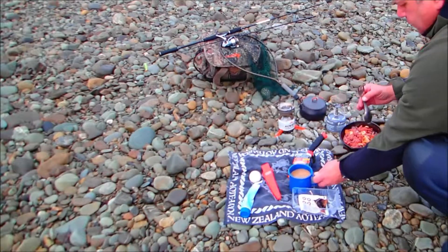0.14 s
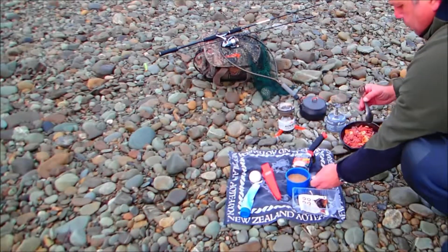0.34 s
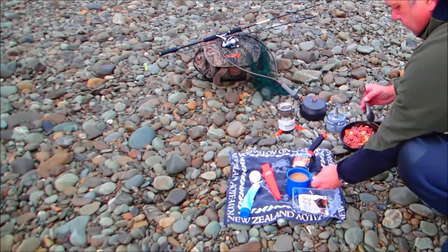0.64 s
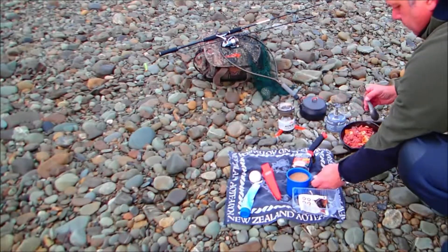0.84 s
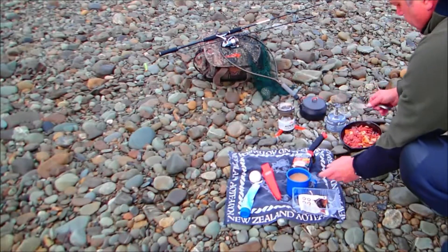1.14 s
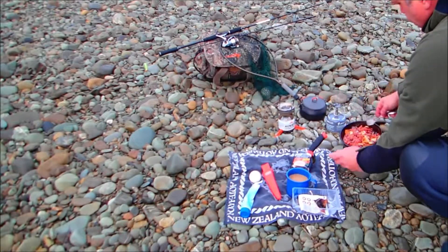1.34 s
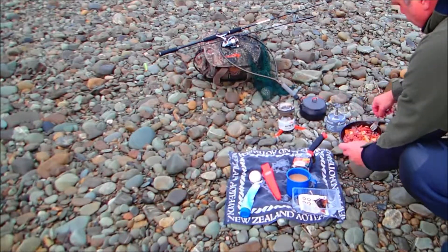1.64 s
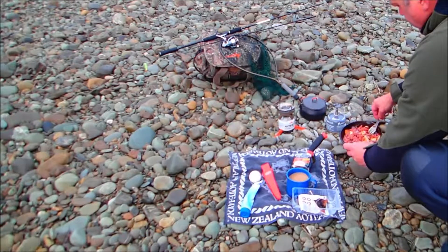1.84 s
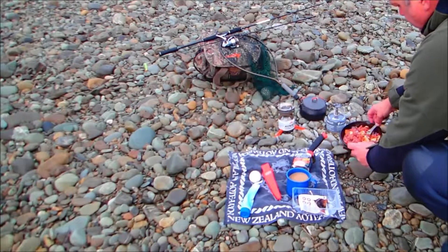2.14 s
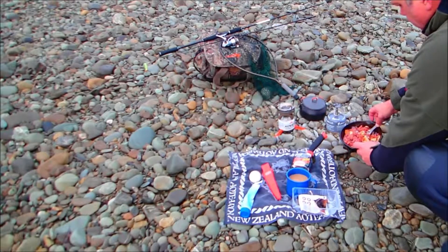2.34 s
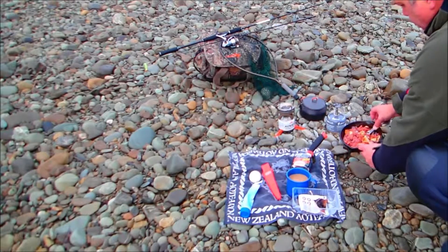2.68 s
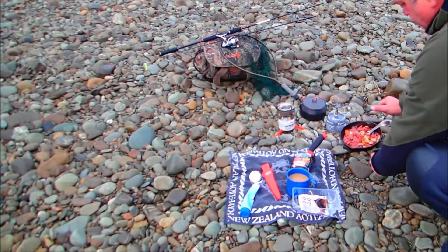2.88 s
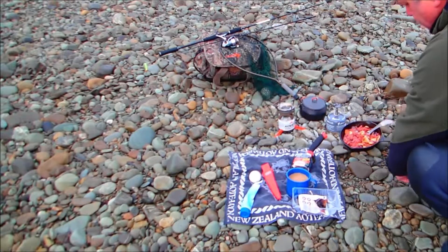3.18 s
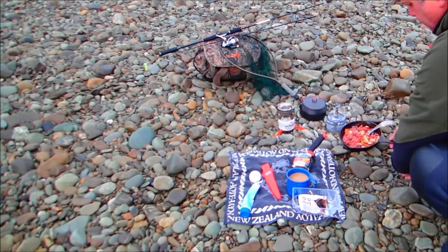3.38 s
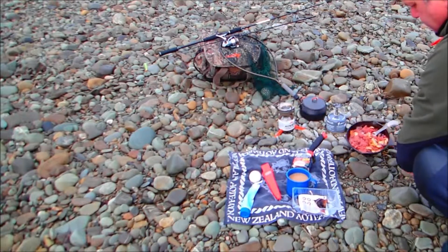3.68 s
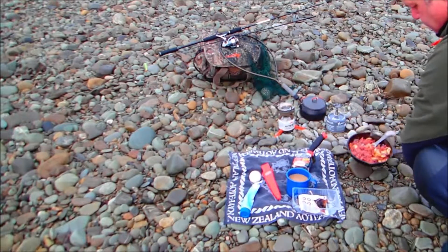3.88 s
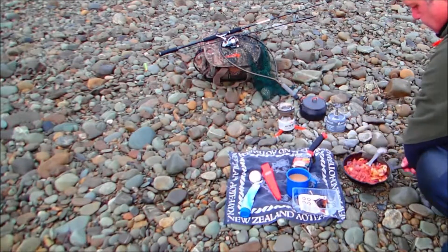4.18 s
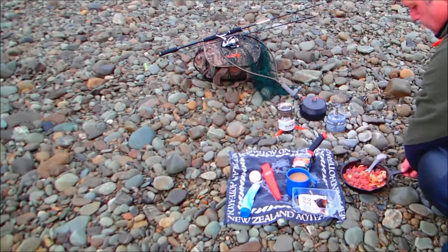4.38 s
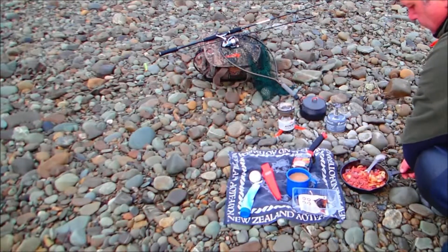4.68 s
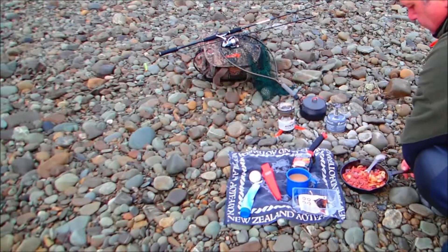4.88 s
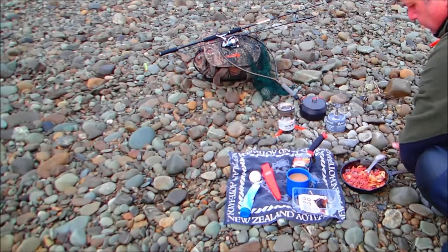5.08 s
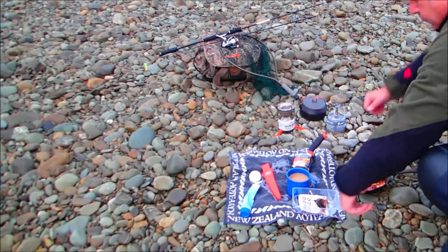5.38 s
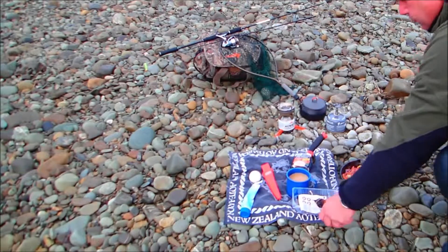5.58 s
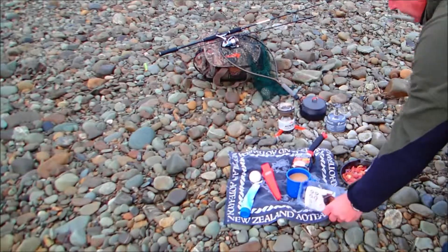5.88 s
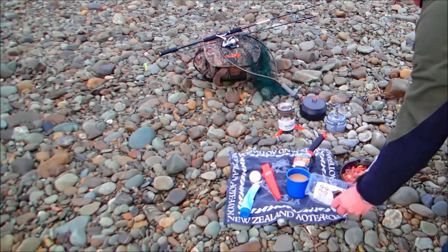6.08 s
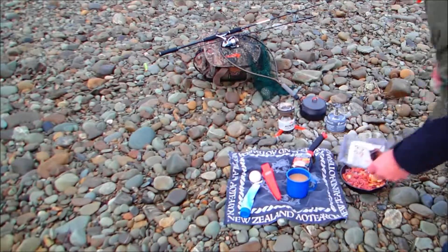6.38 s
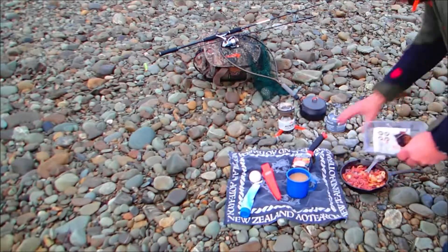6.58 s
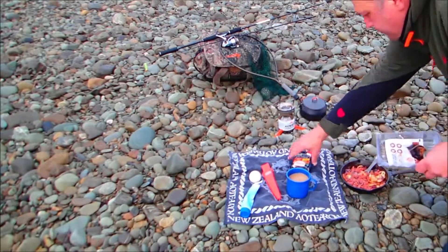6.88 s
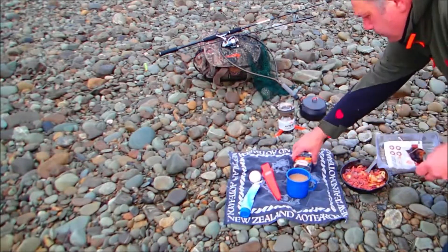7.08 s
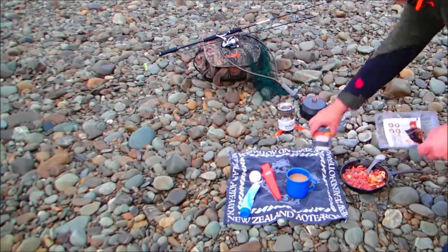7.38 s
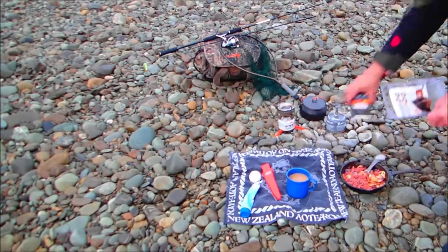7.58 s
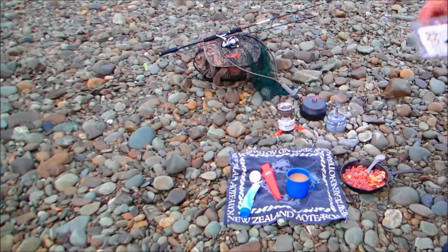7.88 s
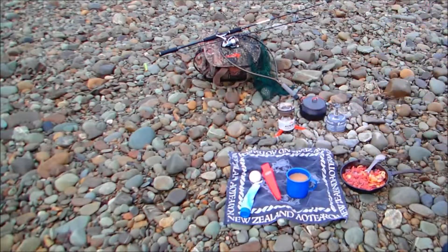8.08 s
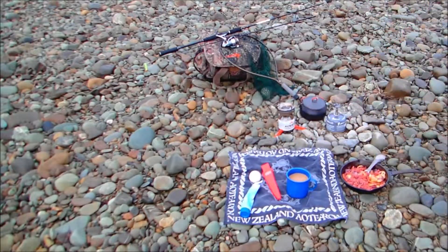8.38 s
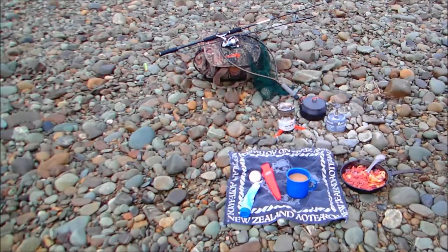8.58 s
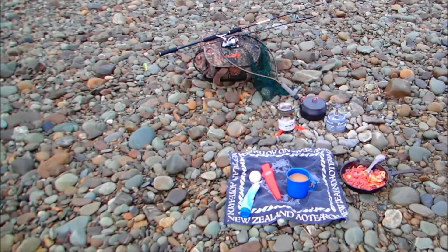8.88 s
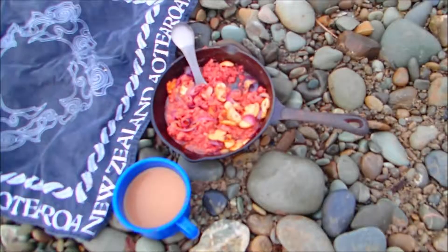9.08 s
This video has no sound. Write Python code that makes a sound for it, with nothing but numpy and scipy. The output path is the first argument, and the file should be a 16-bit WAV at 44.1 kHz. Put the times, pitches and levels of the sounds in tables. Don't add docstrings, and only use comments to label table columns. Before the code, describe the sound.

Close handling sounds, slightly left, over a distant rushing river and lively songbirds. First come light fabric shuffles, a brief spoon tick and low wind bumps, then two rapid metallic knocks as a pan settles on stones. Plastic crackling and sleeve sweeps grow brighter and busier, ending with loud dry pebble clacks underfoot. Open air, small stereo microphone, short bird echoes.

```python
import sys
import numpy as np
from scipy import signal
from scipy.fft import rfft, irfft
from scipy.io import wavfile
from scipy.ndimage import uniform_filter1d

SR = 44100
rng = np.random.default_rng(int(sys.argv[2]) if len(sys.argv) > 2 else 0)


def file_out(sig):
    cols = np.atleast_2d(sig).T
    lim = np.clip(cols, -1, 1)
    pcm = np.round(lim * 32767).astype(np.int16)
    wavfile.write(sys.argv[1], SR, pcm)


def invert_db(x):
    u = np.asarray(x, float) / 20
    return 10 ** u


N = 407484

# (frequency [Hz], density [dB per Hz])
RIVER_SPECTRUM = [(88, -11), (150, -5.5), (723, -0.5), (972, -4.5), (1790, -7.5), (3420, -6.5),
                  (4080, -9.5), (4510, -9), (5380, -3.5), (6050, -12), (7970, -15.5), (15000, -17.5),
                  (16500, -25)]
# (frequency [Hz], correlation [0..1])
RIVER_LIKENESS = [(200, 0.51), (1500, 0.26), (3000, 0.46), (5500, 0.3), (8000, 0.057), (15000, .02)]
# (time [s], level [dB])
GUSTS = [(0, -76), (1.45, -72), (1.7, -54), (1.9, -76), (2.25, -60.5), (2.6, -67), (3.5, -71), (4.4, -73.5),
         (4.6, -63.5), (5.7, -65), (6.0, -75), (9.24, -74)]
# (time [s], level [dB], 10 dB under the peak, pitch [Hz], left-right difference [dB])
WIND_PUFFS = [(1.635, -38.5, 130, 21.0), (1.677, -42, 145, 15.0), (1.699, -48, 118, -5),
              (2.711, -48.5, 111, -2), (2.728, -48.5, 167, 7), (2.8, -50, 127, 4), (2.914, -51, 145, 4),
              (3.109, -48.5, 122, 15.5), (3.174, -45.5, 163, -1), (4.645, -44, 113, -18),
              (4.759, -53, 72.54, 8.5), (8.059, -49, 252, 0)]

# (frequency [Hz], density [dB per Hz])
RUSTLE_SPECTRUM = [(200, -12.5), (562, -7), (1610, -11), (2600, -6), (4200, -19), (4800, -8.5), (5300, -2),
                   (5900, -10), (6800, -19), (8000, -18), (12000, -18.5), (14000, -29), (16500, -47)]
# (time [s], rustle level [dB])
FIDGETING = [(0, -53), (.3, -50), (1.0, -50.5), (1.5, -68), (2.2, -55.5), (2.7, -48), (3.3, -52.5),
             (3.75, -58), (4.2, -52), (4.45, -77), (4.6, -62.5), (5.4, -48), (5.6, -44), (6.9, -44.5),
             (6.97, -55), (7.1, -44.5), (9.1, -44.5), (9.14, -64)]
# (start [s], crest [s], end [s], crest level [dB])
RUB_STROKES = [(-.02, 0, 0.032, -43.5), (2.267, 2.375, 2.46, -46.5), (4.002, 4.005, 4.026, -36.5),
               (4.486, 4.522, 4.58, -45.5), (6.165, 6.281, 6.36, -38), (6.546, 6.75, 7.0, -42.5),
               (6.817, 6.838, 6.865, -37.5), (7.14, 7.37, 7.73, -36), (7.394, 7.7, 7.9, -38),
               (7.718, 7.85, 7.9, -34.5), (8.013, 8.055, 8.115, -32), (8.05, 8.24, 8.36, -39),
               (8.32, 8.36, 8.39, -36.5), (8.4, 8.46, 8.3, -41), (8.527, 8.544, 8.63, -37.5),
               (8.85, 8.953, 9, -42), (9.066, 9.112, 9.05, -35.5)]
# (time [s], treble re middle [dB])
RUB_SHEEN = [
    (0, -19),
    (5.4, -13),
    (5.85, -6.5),
    (6.5, -10),
    (6.75, -8),
    (6.9, -11.5),
    (8.45, -10.5),
    (8.55, -16.5),
    (9.11, -11),
]

# (share of length [0..1], pitch ratio [1], relative level [dB])
ARCH_SHAPE = [(0, .87, -10.5), (.17, 0.97, -3.5), (.4, 1, -1), (.68, 0.97, -2), (.86, .83, -5),
              (1, .71, -10)]
TENT_SHAPE = [(0, .88, -4), (.27, 1, 0), (.55, .91, -3.5), (1, 0.7, -10)]
SCOOP_SHAPE = [(0, 1.54, -3), (.05, 1.44, 0), (.16, 1.39, -0.5), (.26, 1.05, -4), (.38, 1, -2.5),
               (.45, 1.03, -7), (.7, 1.1, -8), (.76, 1.2, -4), (.9, 1.3, -3.5), (1, 0.97, -6.5)]
PLATEAU_SHAPE = [(0, .95, -4), (.2, 0.98, -3), (.5, 1, 0), (.9, 0.97, -1), (1, .91, -3)]
# (time [s], length [s], top pitch [Hz], level [dB])
ARCH_NOTES = [(.21, .03, 4910, -44), (0.518, 0.078, 3650, -50), (0.751, .085, 3770, -46.5),
              (1.914, 0.072, 3900, -42), (2.959, 0.018, 3650, -45), (3.0, 0.026, 3650, -47),
              (3.145, 0.028, 3680, -51), (4.936, .16, 3396, -43.5), (5.097, .045, 2130, -44.5),
              (5.325, .06, 2300, -45), (5.56, .055, 2154, -44), (5.69, 0.15, 3193, -47),
              (5.605, .1, 2580, -44), (7.345, .04, 2750, -51), (5.81, 0.059, 2070, -45.5)]
# (time [s], length [s], top pitch [Hz], level [dB])
TENT_NOTES = [
    (1.055, 0.044, 4600, -47),
    (1.13, .03, 4700, -49),
    (1.17, .07, 4650, -49.5),
    (2.06, .03, 3650, -45.5),
    (3.81, 0.053, 5380, -52),
    (5.322, .045, 4600, -50),
    (5.462, .068, 4700, -48),
    (3.91, .035, 4600, -55),
    (5.86, .13, 3536, -45),
    (.895, 0.037, 3550, -45),
]
# (time [s], length [s], lowest pitch [Hz], level [dB])
SCOOP_NOTES = [
    (1.05, .185, 2372, -45),
    (2.215, .17, 2380, -44),
]
# (time [s], length [s], top pitch [Hz], level [dB])
PLATEAU_NOTES = [
    (.465, .205, 6050, -44),
    (2.645, .175, 5920, -46),
    (.525, .12, 4270, -55),
    (2.72, .09, 4300, -57),
    (2.47, 0.235, 4000, -54),
    (5.7, .19, 4000, -54),
    (7.04, 0.051, 2640, -52),
    (6.145, .04, 3220, -46),
    (8.45, .09, 2400, -57),
]
# (time [s], top pitch [Hz], level [dB])
CHIP_NOTES = [(.255, 4890, -40), (.385, 5600, -43), (.452, 5300, -47), (.742, 5680, -39),
              (.83, 5600, -37.5), (2.36, 6170, -40), (2.432, 5300, -41), (2.193, 5400, -49),
              (2.21, 5500, -48), (2.262, 5400, -50), (2.28, 5400, -47), (2.622, 5400, -39.5),
              (2.898, 5530, -36.5), (3.0, 5850, -41.5), (3.075, 5600, -36.5), (3.2295, 5700, -35),
              (5.29, 5050, -45)]
# (start [s], end [s], top pitch [Hz], level [dB])
SCOLDING = [
    (2.34, 2.43, 6310, -44),
]
# (time [s], length [s], start pitch [Hz], end pitch [Hz], level [dB])
PLAIN_GLIDES = [(.27, .04, 4160, 3880, -51), (0.301, .22, 3890, 3510, -51.5),
                (0.372, .009, 3600, 2850, -51), (0.596, .04, 3110, 2840, -55),
                (.835, .025, 2700, 2280, -56), (.86, 0.042, 2260, 3040, -51.5),
                (1.008, 0.041, 5040, 3600, -48), (1.755, .085, 3350, 2550, -53),
                (2.016, 0.048, 2650, 3360, -48), (2.79, 0.017, 3640, 3620, -49.5),
                (2.83, .02, 3600, 3310, -49), (3.04, 0.055, 3500, 2400, -51), (3.865, .03, 3500, 4700, -54),
                (3.89, .025, 4750, 4250, -55), (6.484, 0.043, 2180, 1840, -52),
                (6.72, 0.053, 2340, 2370, -47.5), (6.752, 0.03, 2600, 3950, -43),
                (7.28, 0.045, 2850, 3280, -49), (7.52, 0.032, 2830, 2360, -45)]
# (time [s], length [s], start pitch [Hz], end pitch [Hz], level
# [dB])
MORE_GLIDES = [(4.04, .045, 4800, 3400, -58), (6.945, 0.028, 5290, 5050, -42),
               (7.014, .01, 6800, 5200, -37), (7.957, .022, 2760, 2510, -45),
               (5.672, .055, 2450, 2200, -50), (8.625, 0.11, 3520, 4304, -55)]
# (time [s], length [s], start pitch [Hz], end pitch [Hz], level [dB])
ZIGZAG_GLIDES = [(1.075, .03, 4200, 3800, -55), (1.112, .018, 4500, 4150, -52),
                 (1.155, .02, 3750, 4100, -53), (1.215, .028, 3700, 3500, -50),
                 (1.095, .03, 5200, 5100, -57), (1.175, .045, 5500, 5450, -57),
                 (2.25, .05, 3500, 3500, -55), (2.39, .025, 3400, 3700, -52),
                 (2.405, .028, 4900, 5500, -47), (2.425, .03, 3250, 3200, -54),
                 (2.53, .03, 3400, 2950, -51), (2.58, .018, 4100, 4400, -50), (2.6, .04, 3300, 3100, -56),
                 (3.84, .06, 3100, 2950, -59), (3.99, .04, 3900, 3500, -56), (4.095, .04, 4500, 4650, -58),
                 (4.17, .02, 2450, 2500, -59), (4.195, .04, 3700, 3950, -59), (4.25, .07, 3300, 3350, -57),
                 (5.143, .02, 3400, 3850, -50), (5.17, .035, 4700, 4500, -55),
                 (5.278, .015, 3600, 4500, -54), (5.29, .03, 5000, 4100, -49),
                 (5.368, .035, 4900, 3800, -52), (5.415, .018, 4300, 4700, -52),
                 (5.432, .01, 4700, 4200, -50), (5.447, .018, 5800, 4200, -48),
                 (6.21, .03, 2900, 2600, -51), (6.255, .03, 2700, 3200, -52), (7.58, .045, 2700, 2250, -52),
                 (8.68, .035, 2100, 2300, -55), (8.69, .02, 4750, 4600, -48)]
# (time [s], length [s], start pitch [Hz], end pitch [Hz], level [dB])
PHRASE_TAGS = [(.18, .014, 2700, 3900, -53), (.248, .01, 2600, 3700, -52), (.255, .018, 3700, 2300, -54),
               (.38, .018, 2800, 2700, -51), (1.698, .022, 3000, 4100, -56), (1.725, .025, 4000, 3150, -54),
               (1.89, .03, 2600, 3100, -57), (2.085, .007, 5300, 5000, -44), (2.632, .022, 6100, 5650, -48),
               (2.82, .06, 5900, 5900, -53), (3.085, .03, 4200, 3100, -55), (3.19, .02, 3750, 3300, -52),
               (5.1, .15, 3400, 3400, -61), (5.25, .03, 5000, 5050, -49), (6.93, .007, 7200, 5300, -46),
               (6.93, .05, 3000, 3500, -56), (7.09, .03, 2300, 2350, -52), (8.385, .03, 2600, 2500, -53),
               (8.82, .03, 2300, 2100, -57), (8.98, .09, 4000, 3950, -52)]
# (start [s], end [s], middle pitch [Hz], level [dB])
FAR_TWITTER = [
    (0.122, 0.301, 3880, -55.5),
    (3.057, 3.296, 3390, -58),
    (2.31, 2.42, 3300, -57),
]

# (time [s], peak [dB], body re peak [dB], top re peak [dB])
PEBBLE_CLICKS = [(0.797, -33, -23, -24), (1.335, -27.5, -24, -29), (2.6606, -19.5, -11.5, -10),
                 (7.8535, -20, -20, -18), (4.9134, -29, -20, -25), (6.779, -22, -23, -26),
                 (6.88, -21, -13, -27), (7.518, -25, 1, -26), (7.7592, -22, -3, -15),
                 (7.7936, -16, -20, -8), (8.0198, -12.5, -10, -9), (8.057, -19, -19, -17),
                 (8.0974, -13, -22, -17), (8.2472, -17.5, -14, -14), (8.335, -17.5, -30, -12),
                 (8.4383, -9.5, -14, -8), (8.4457, -14, -11, -1), (8.5365, -14, -18, -14),
                 (8.7996, -2.5, -24, -16), (8.8173, -23, -15, -30), (8.853, -25, -28, -25),
                 (8.8923, -24, -25, -12), (9.1054, -23.5, -11, 3)]
# (time [s], peak [dB], body re peak [dB], top re peak [dB])
RUSTLE_TICKS = [(6.0985, -31, -20, -15), (6.1308, -28, -20, -15), (6.1553, -31, -20, -15),
                (6.8252, -26, -20, -20), (6.8317, -24, -20, -20), (7.0936, -28, -18, -20),
                (7.1086, -27, -8, -18), (7.2368, -25, -20, -18), (7.2792, -27, -20, -18),
                (7.384, -23, -20, -18), (7.6154, -25, -20, -18), (7.6815, -26, -20, -18),
                (7.7352, -26, -20, -18), (7.7745, -25, -14, -18), (7.8145, -21, -16, -18),
                (7.9148, -28, -20, -16), (8.1452, -26, -20, -18), (8.159, -24, -18, -14),
                (8.2106, -27, -20, -18), (8.2919, -27, -20, -18), (8.497, -34, 0, -18),
                (6.745, -30, 0, -14), (8.563, -32, -20, -2), (8.6296, -31, -20, -18),
                (8.7778, -30, -22, -20), (8.9509, -27, -20, -18), (9.0477, -27, -20, -16),
                (9.0936, -29, -16, -12)]
# (start [s], end [s], level [dB])
SKID = (1.617, 1.632, -32.5)
# (frequency [Hz], level [dB], t60 [s])
SPOON_MODES = [(2620, -20, 0.049), (3190, -16, .025), (4670, -16, 0.024), (5180, -3, 0.037),
               (6200, -0.5, 0.034), (7740, -11, 0.013), (9700, -9, 0.01), (11410, -4, 0.0078),
               (13700, -5, .008)]
# (time [s], peak [dB])
PAN_TOUCHES = [
    (4.3298, -8.5),
    (4.373, -7.5),
]
# (frequency [Hz], level [dB], t60 [s])
PAN_RIM_MODES = [(960, -18, 0.035), (1900, -17, 0.012), (2640, -40, 0.069), (3520, -26, 0.057),
                 (4554, -11, 0.039), (5180, 0.5, 0.03), (5790, 2, 0.025), (5866, 0, 0.025),
                 (6240, -11, 0.037), (6508, -20, 0.039)]
# (frequency [Hz], level [dB], t60 [s])
PAN_BASE_MODES = [(1300, -10, 0.014), (1620, -14, 0.035), (2050, -15, 0.012), (3250, -19, 0.014),
                  (3700, -36, 0.17), (4540, -10, 0.025), (5250, 0, 0.017), (5846, -10, 0.031),
                  (6525, -38, 0.032)]


def rms_one(x):
    return x / np.sqrt(np.mean(x ** 2) + 1e-20)


def in_time(rows):
    s, *columns = np.transpose(rows)
    return [np.interp(np.arange(N) / SR, s, column) for column in columns]


def at_hz(points, hz):
    point_hz, values = np.array(points)[:, 0], np.array(points)[:, 1]
    return np.interp(np.log(hz + 1), np.log(point_hz), values)


def drift(rate_hz):
    hop = 100
    pole = np.exp(-2 * np.pi * rate_hz * hop / SR)
    noise = rng.standard_normal(N // hop + 402)
    slow = signal.lfilter([1], [1, -2 * pole, pole * pole], noise)[400:]
    return np.interp(np.arange(N) / hop, np.arange(len(slow)), rms_one(slow - slow.mean()))


def band(x, lo_hz, hi_hz):
    return signal.sosfilt(signal.butter(3, [lo_hz, min(hi_hz, .45 * SR)], "band", fs=SR, output="sos"), x)


def colour(x, spectrum):
    gain = invert_db(at_hz(spectrum, np.fft.rfftfreq(4096, 1 / SR)))
    cepstrum = irfft(np.log(gain))
    cepstrum[1:2048] *= 2
    cepstrum[2049:] = 0
    response = irfft(np.exp(rfft(cepstrum)))[:2048]
    return signal.oaconvolve(x, response)[:N]


def placed(x, pan_db):
    return np.array([np.roll(x, 1) * invert_db(pan_db / 2), x * invert_db(-pan_db / 2)])


def river():
    level_db = -50 + 0.21 * drift(0.98)
    hz = np.fft.rfftfreq(N, 1 / SR)
    alike = np.clip(at_hz(RIVER_LIKENESS, hz), 0, 1)
    mid, side = rfft(rng.standard_normal((2, N)))
    ports = np.sqrt(1 + alike) * mid + np.sqrt(1 - alike) * side * [[1], [-1]]
    wash = irfft(invert_db(at_hz(RIVER_SPECTRUM, hz)) * ports, N)
    return invert_db(level_db) * rms_one(band(wash, 97, 18000))


def wind():
    gust_db, = in_time(GUSTS)
    rumble = np.array([rms_one(band(rng.standard_normal(N), 50.0, 177)) * invert_db(2.8 * drift(12))
                       for port in range(2)])
    out = rumble * invert_db(gust_db + np.array([[1.5], [-1.5]]))
    t = np.arange(-.012 * SR, .03 * SR) / SR
    shape = np.exp(-(t / np.where(t < 0, .004, .009)) ** 2)
    for s, db, hz, pan_db in WIND_PUFFS:
        at = round((s - .008) * SR)
        for port, side in enumerate((1, -1)):
            phase = 2 * np.pi * hz * t + port * np.pi / 2
            level = invert_db(db + 10.0 + min(side * pan_db, 0))
            out[port, at:at + len(t)] += level * shape * np.cos(phase)
    return out


def effort():
    edge_db = 13.5
    t, power = np.arange(N) / SR, invert_db(2 * in_time(FIDGETING)[0])
    for start, crest, end, db in RUB_STROKES:
        before = (crest - t) / max(crest - start, .005)
        after = (t - crest) / max(end - crest, .005)
        away = np.where(t < crest, before, after)
        power += invert_db(2 * (db - edge_db * np.minimum(away, 3) ** 2))
    return 10 * np.log10(power)


def rustle():
    grains_per_s = 5000
    level_db, (top_db,) = effort(), in_time(RUB_SHEEN)
    coarse_db = np.clip(2.5 + 0.13 * (level_db + 38.5), 0, 7)
    size_db = coarse_db * np.minimum(rng.exponential(1, (3, N)), 5)
    sizes = invert_db(size_db) * rng.choice([-1, 1], (3, N))
    born = rng.random((3, N)) < grains_per_s * invert_db(2.2 * drift(35)) / SR
    grains = sizes * born / invert_db(0.43 * coarse_db)
    near, left, right = (colour(g, RUSTLE_SPECTRUM) for g in grains)
    scatter = np.array([left, right])
    low = placed(near, 0.17) + 0.28 * scatter
    high = placed(near, 0.93) + 0.77 * scatter
    body_db = -12 + 0.43 * (top_db + 9)
    parts = [(band(low, 4200, 6800), 0),
             (band(high, 6800, 17000), top_db),
             (band(low, 150, 4000), body_db)]
    return sum(rms_one(part) * invert_db(level_db + rel_db) for part, rel_db in parts)


def trilled(note):
    rate_hz, pitch_depth, level_depth_db = 92, .07, 5
    s, hz, db = np.transpose(note)
    t = np.arange(s[0], s[-1], .001)
    share = (t - s[0]) / (s[-1] - s[0])
    wobble = np.sin(2 * np.pi * rate_hz * t) * (share > .4) * (share < .74)
    pitch_hz = np.interp(t, s, hz) * (1 + pitch_depth * wobble)
    return list(zip(t, pitch_hz, np.interp(t, s, db) - level_depth_db * wobble))


def shaped(shape, rows):
    return [[(s + share * length, ratio * hz, db + rel_db) for share, ratio, rel_db in shape]
            for s, length, hz, db in rows]


def chips():
    lag_s, length_s, fall, fade_db = .003, .0095, .12, 2.5
    scold_per_s = 110
    rows = list(CHIP_NOTES)
    for start, end, hz, db in SCOLDING:
        for when, low, soft in rng.random((round(scold_per_s * (end - start)), 3)):
            rows.append((start + when * (end - start), hz * (1 - .2 * low), db - 8 * soft))
    return [[(s + lag_s, hz, db), (s + length_s, hz * (1 - fall), db - fade_db)] for s, hz, db in rows]


def glides():
    swell_db, fade_db = 1.5, 3
    notes = []
    for rows in (PLAIN_GLIDES, MORE_GLIDES, ZIGZAG_GLIDES, PHRASE_TAGS):
        for s, length, start_hz, end_hz, db in rows:
            notes.append([(s, start_hz, db - swell_db),
                          (s + length / 2, (start_hz + end_hz) / 2, db),
                          (s + length, end_hz, db - fade_db)])
    return notes


def twitter():
    notes_per_s = 70
    notes = []
    for start, end, hz, db in FAR_TWITTER:
        for when, where, rise, fall, size in rng.random((round(notes_per_s * (end - start)), 5)):
            s = start + when * (end - start - .02)
            top_hz = hz * (.95 + .3 * where)
            span = 0.00617 + .016 * size
            level_db = db - 6 * size
            notes.append([(s, top_hz * (1 - .2 * rise), level_db),
                          (s + .6 * span, top_hz, level_db),
                          (s + 2 * span, top_hz * (.97 - .25 * fall), level_db)])
    return notes


def song():
    notes = [trilled(note) for note in shaped(SCOOP_SHAPE, SCOOP_NOTES)]
    notes += shaped(ARCH_SHAPE, ARCH_NOTES) + shaped(TENT_SHAPE, TENT_NOTES)
    notes += shaped(PLATEAU_SHAPE, PLATEAU_NOTES)
    return notes + chips() + glides() + twitter()


def whistle(quaver, note):
    s, hz, db = np.transpose(note)
    at = np.arange(round((s[0] - .003) * SR), round((s[-1] + .003) * SR))
    pitch_hz = uniform_filter1d(np.interp(at / SR, s, hz), size=101, mode="nearest")
    edge = np.clip(np.minimum(at - at[0], at[-1] - at) / (0.0015 * SR), 0, 1)
    level = invert_db(np.interp(at / SR, s, db)) * edge
    phase = 2 * np.pi * np.cumsum(pitch_hz * quaver[at]) / SR
    return at, np.sqrt(2) * level * np.sin(phase)


def birds():
    echo_t60_s, echo_db = 0.33, -4
    out = np.zeros(N)
    quaver = 1 + 0.0038 * drift(22.3) + 0.0063 * drift(104)
    for note in song():
        at, sound = whistle(quaver, note)
        out[at] += sound
    out *= invert_db(2.5 * drift(80))
    t = np.arange(int(.3 * SR)) / SR
    bank = rng.standard_normal((2, len(t))) * invert_db(-60 * t / echo_t60_s) * (t > .004)
    bank /= np.sqrt(np.sum(bank ** 2))
    echoes = signal.oaconvolve(out[None], bank, axes=1)[:, :N]
    return out * invert_db(np.array([[-.5], [.5]])) + invert_db(echo_db) * echoes


def clicks(rows):
    knock_hz, thud_db = 2300, -11
    t = np.arange(int(.03 * SR)) / SR
    decay = np.exp(-t / .0006) + .06 * np.exp(-t / .006)
    bursts = rng.standard_normal((len(rows), len(t))) * decay
    out = np.zeros(N + len(t))
    for (s, db, body_db, top_db), raw in zip(rows, bursts):
        burst = colour(raw, RUSTLE_SPECTRUM)[:len(t)]
        parts = [(band(band(burst, 4000, 7000), 4000, 8000), 0),
                 (band(raw, 7000, 15500), top_db),
                 (band(raw, knock_hz, 4000), body_db),
                 (band(raw, 600, knock_hz), body_db + thud_db)]
        at = round(s * SR)
        for part, rel_db in parts:
            out[at:at + len(t)] += part / np.abs(part).max() * invert_db(db + rel_db)
    return out[:N]


def ring(impulses, hz, t60):
    r, w = invert_db(-60 / (t60 * SR)), 2 * np.pi * hz / SR
    return signal.lfilter([0, np.sin(w)], [1, -2 * r * np.cos(w), r * r], impulses + 1e-18)


def struck(hits, modes, spread_db):
    out = np.zeros(N)
    for hz, level_db, t60 in modes:
        train = np.zeros(N)
        for s, db in hits:
            strength_db = db + level_db + spread_db * rng.standard_normal()
            train[round(s * SR)] = invert_db(strength_db) * rng.choice([-1, 1])
        out += ring(train, hz, t60)
    return out


def spoon():
    start, end, db = SKID
    touches = [(start, db + 2.5)]
    for when, soft in rng.random((24, 2)):
        touches.append((start + (end - start) * when, db - 8 * soft))
    return struck(touches, SPOON_MODES, 4.3)


def pan():
    crack_db = -6
    rim = struck(PAN_TOUCHES[:1], PAN_RIM_MODES, 0)
    base = struck(PAN_TOUCHES[1:], PAN_BASE_MODES, 0)
    out = invert_db(-3.5) * (rim + base)
    t = np.arange(int(.02 * SR)) / SR
    for s, db in PAN_TOUCHES:
        crack = band(rng.standard_normal(len(t)) * np.exp(-t / 0.0013), 620, 5700)
        at = round(s * SR)
        out[at:at + len(t)] += invert_db(db + crack_db) * crack / np.abs(crack).max()
    return band(band(out, 640, 7400), 550, 9200) + invert_db(-10.5) * out


def scene():
    background = river() + wind() + rustle() + birds()
    contacts = placed(clicks(PEBBLE_CLICKS), .8) + placed(clicks(RUSTLE_TICKS), .7)
    metal = placed(spoon(), .6) + placed(pan(), 0.31)
    return background + contacts + metal


def roll_off(x):
    return signal.sosfilt(signal.butter(12, 16780, fs=SR, output="sos"), x)


def record(dry):
    dip_hz, dip_width_hz, dip_depth = 4050, 280, .88
    cutoff_hz, left_db = 15900, 1.54
    turn = np.exp(2j * np.pi * np.cumsum(dip_hz + 70 * drift(2.5)) / SR)
    r = np.exp(-np.pi * dip_width_hz / SR)
    smooth = signal.lfilter([1 - r], [1, -r], dry / turn)
    narrow = 2 * np.real(smooth * turn)
    heard = dry - np.clip(dip_depth + .25 * drift(3.0), 0, 1) * narrow
    heard = signal.sosfilt(signal.cheby2(16, 30, cutoff_hz, fs=SR, output="sos"), heard)
    mix = heard * invert_db(np.array([[left_db], [-left_db]]))
    return roll_off(mix)


dry = scene()
out = record(dry)
file_out(out)
```